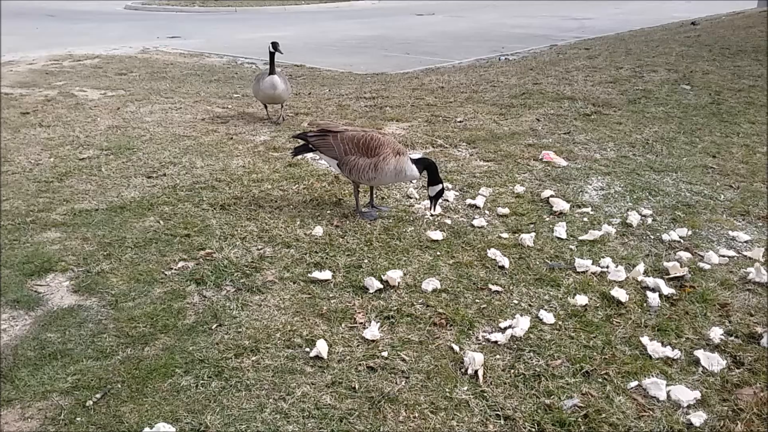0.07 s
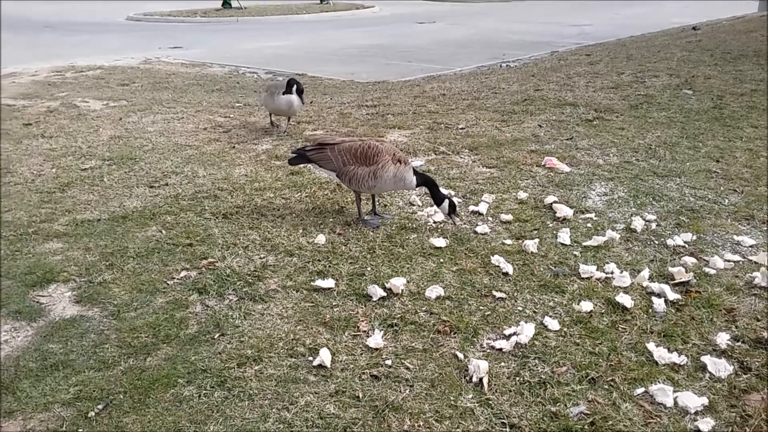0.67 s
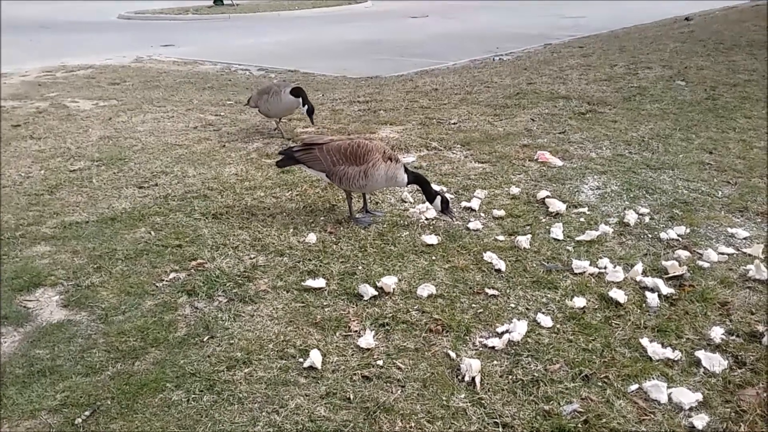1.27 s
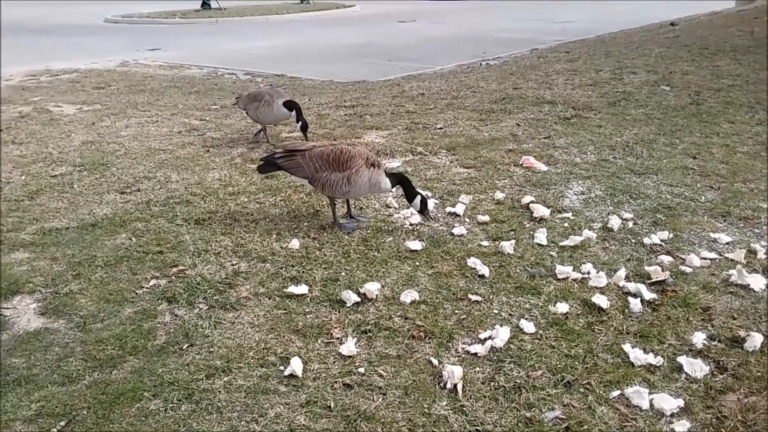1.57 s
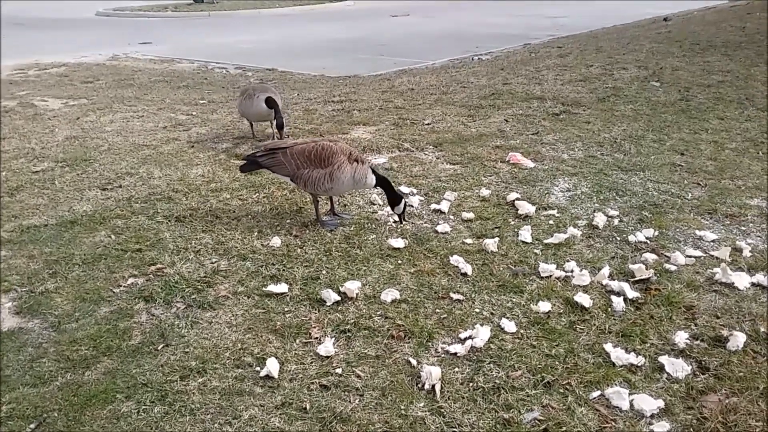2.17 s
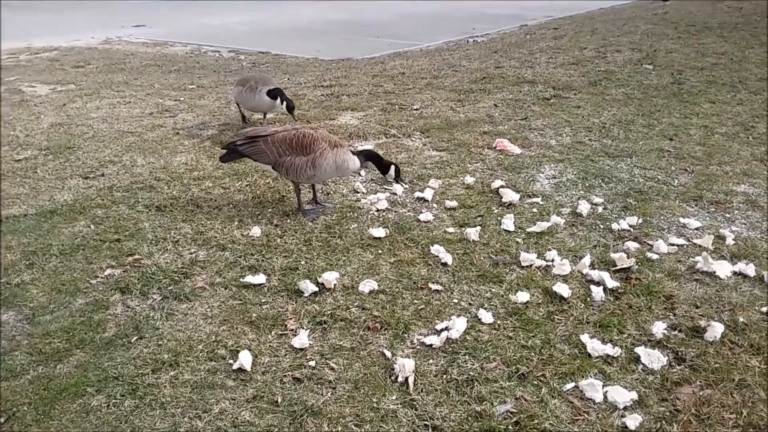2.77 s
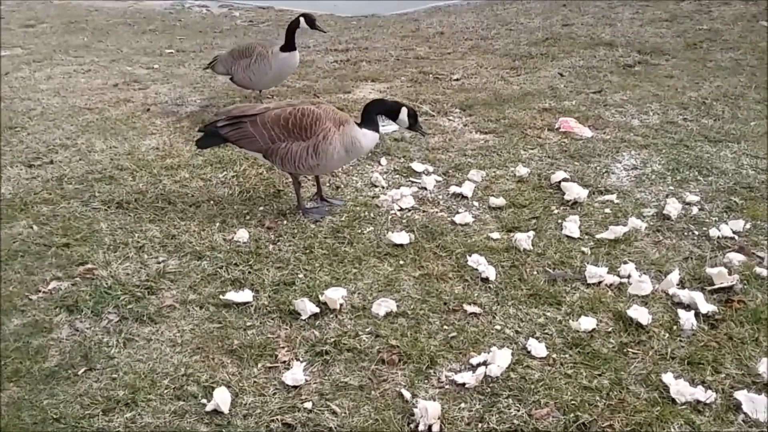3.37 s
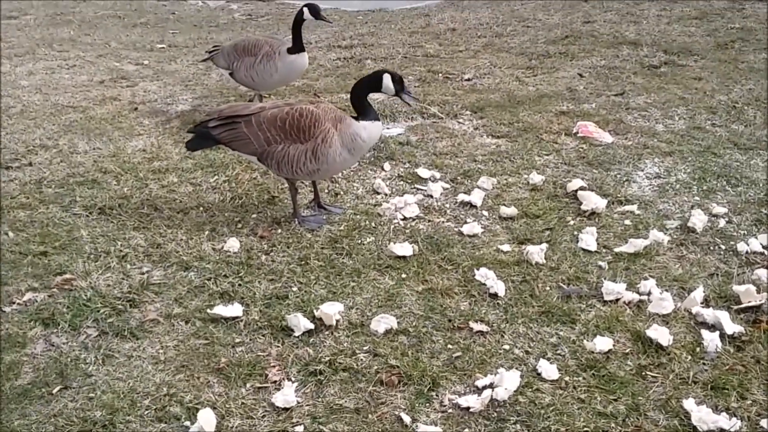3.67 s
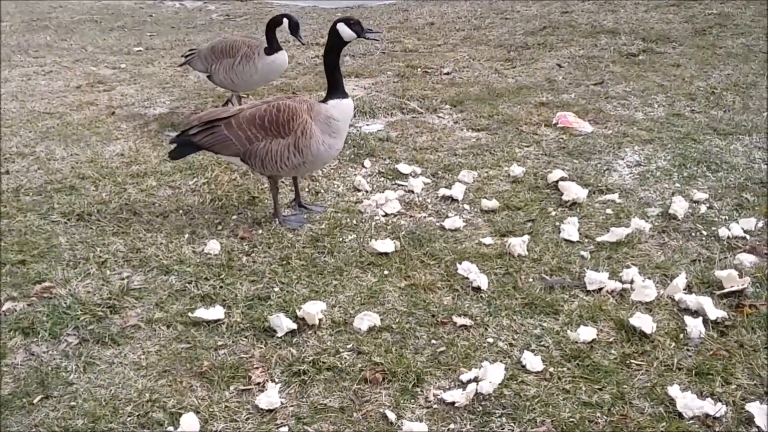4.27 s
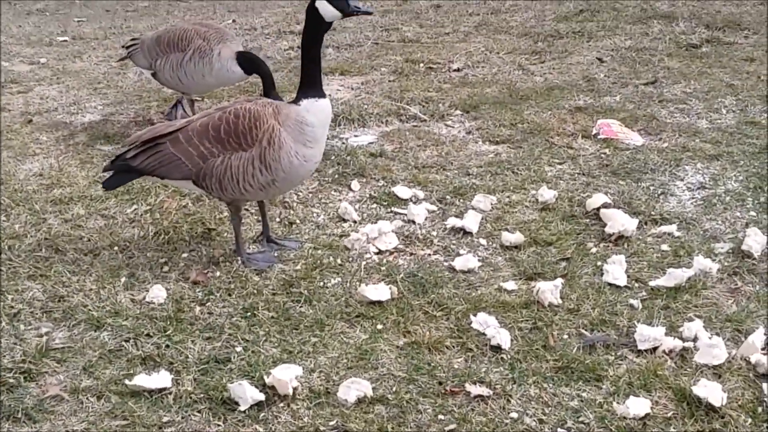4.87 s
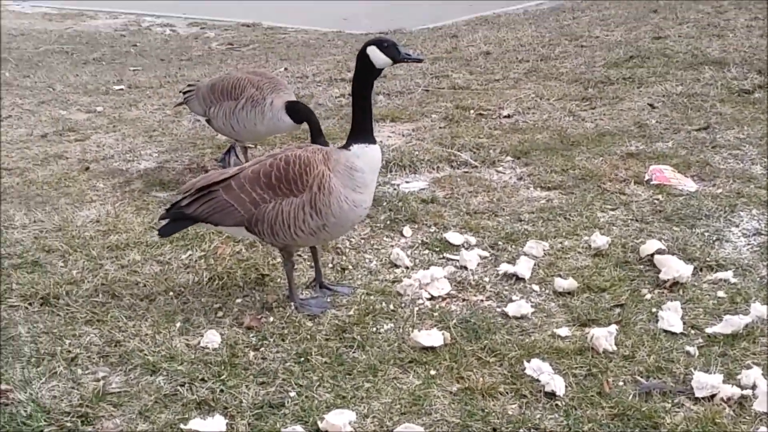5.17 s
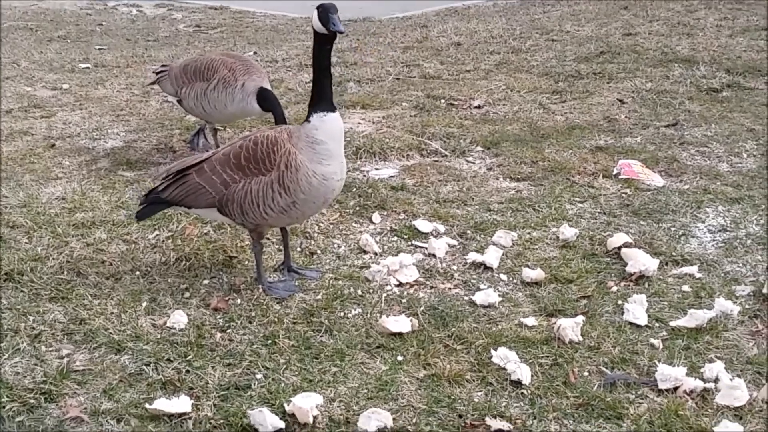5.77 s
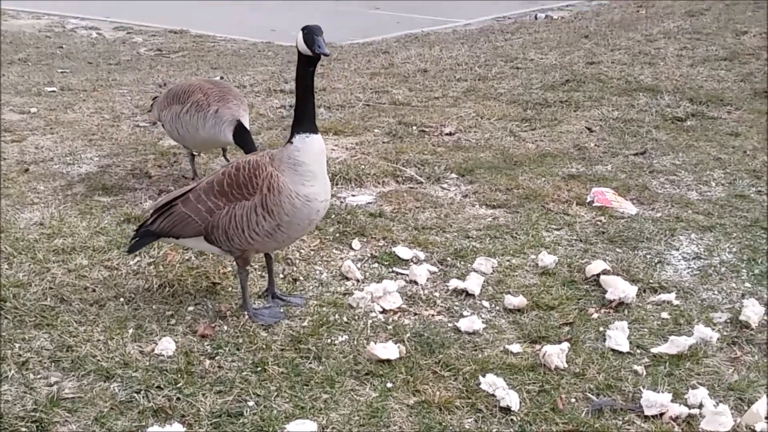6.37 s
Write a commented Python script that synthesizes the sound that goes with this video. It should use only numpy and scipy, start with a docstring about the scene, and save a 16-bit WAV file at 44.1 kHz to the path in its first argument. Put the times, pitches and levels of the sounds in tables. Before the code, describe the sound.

Far road noise with a swelling engine drone, faint two-note bird calls, dull microphone bumps and light jacket swishes.

```python
"""After a short silence, far traffic fades in: low rumble, tyre roar, faint hiss. A small bird starts
repeating a slurred two-note call; another buzzes until 1.3 s. From 1.6 s an engine revs up, its exhaust
orders shaped by the pipe; a second drones in at 2.4 s. Both surge at 4.2 s, then ease off.
Close jacket swishes, dry grass ticks and dull handling bumps, scattered till then, come thickest
after 5 s, where a thin far whistle also sounds briefly."""
import sys
import numpy as np
from scipy import signal
from scipy.fft import rfft, irfft
from scipy.io import wavfile

SR = 44100
rng = np.random.default_rng(int(sys.argv[2]) if len(sys.argv) > 2 else 0)


def wrap_up_sound(samples):
    """Save the sound to the file named by the first command line argument, as 16-bit audio."""
    columns = np.atleast_2d(samples).T
    # keep every value between -1 and 1, then stretch to whole-number steps
    tamed = np.clip(columns, -1, 1)
    steps = np.round(tamed * 32767).astype(np.int16)
    wavfile.write(sys.argv[1], SR, steps)


N = 283122
TIME = np.arange(N) / SR
FREQS = np.maximum(np.arange(N // 2 + 1) * SR / N, 1)
SURGE_S, SURGE_HALF_S = 4.2, 0.25   # both engines

# revving engine pitch: time_s, second_harmonic_hz
REV_PITCH = [(1.65, 144.3), (1.79, 157.4), (2.02, 175.1), (2.46, 187.9), (2.88, 206.5), (3.39, 213.7),
             (3.95, 212.6), (4.21, 202.5), (4.55, 151.1)]
# revving exhaust orders: multiple, gain_db
REV_HARMONICS = [(2, -0.5), (3, -4.5), (4, -8.5)]
# exhaust pipe resonance: freq_hz, gain_db
PIPE_RESPONSE = [(135, -12), (170, -0.5), (205, 0), (255, -2), (280, -8.5), (320, -15.5), (430, -25)]
# droning engine speed: time_s, cycle_hz
DRONE_RATE = [(2.5, 47.4), (3.01, 52.2), (3.68, 53.1), (5.7, 47.73)]
# droning exhaust orders: multiple, gain_db
DRONE_HARMONICS = [(1, -36), (2, -6.5), (3, -7.5), (5, -33), (7, -31)]
# traffic rumble: freq_hz, density_db
RUMBLE_SPECTRUM = [(25, -32), (35, -29), (47, -17.5), (60, -3.5), (75, -8), (95, 3), (118, -4.5), (145, -3),
                   (180, -2.5), (230, -3.5), (295, -8), (380, -18), (500, -27.5)]
# tyre roar: freq_hz, density_db
TYRE_SPECTRUM = [(240, -21), (400, -8.5), (480, -3.5), (853, -1), (1450, -1.5), (1870, -6), (2640, -18.5),
                 (3200, -30), (4160, -55), (7040, -120)]
# passing cars: middle_s, half_length_s, boost_db, treble_boost_db
CAR_PASSES = [(.95, 0.28, 0.5, 2.5), (3.65, 0.27, 2.5, -3), (4.6, 0.34, 0.5, 1)]
# handling bumps: start_s, level_db, pitch_hz, t60_s
CASING_BUMPS = [(1.813, -17, 119, 0.036), (2.937, -23, 90, .055), (3.704, -10, 160, 0.027),
                (3.711, -26, 75, 0.052), (5.244, -22, 147, 0.037), (5.453, -27, 168, 0.027)]
# bird calls: start_s, first_note_db, second_note_db, time_stretch
BIRD_CALLS = [(.521, -66, -58, 0.95), (1.417, -63, -65, 0.98), (2.752, -63, -61.5, 0.96),
              (4.193, -66.5, -66.5, 1.03), (5.364, -61, -77, 1.2), (6.158, -64, -69.5, 1.07)]
# notes of one call: delay_s, rise_s, fall_s, first_hz, top_hz, last_hz
CALL_NOTES = [(0, .012, .046, 4260, 5550, 3620), (0.068, 0.017, .028, 3475, 4390, 3310)]
# bird throat resonance: freq_hz, gain_db
THROAT_RESPONSE = [(3200, -7), (3550, 3), (3850, -3), (4400, -11.5), (5200, -6.5), (5700, -10)]
# far whistle: time_s, pitch_hz, level_db
WHISTLE_CURVE = [(5.1, 5700, -83), (5.19, 5730, -81), (5.27, 5680, -76), (5.34, 5650, -79)]
# bird buzz: freq_hz, density_db
BUZZ_SPECTRUM = [(3600, -15), (4200, -8), (4550, 2), (5000, -8), (5600, -8.5), (6200, -21), (7200, -27.5)]
# cloth strokes: middle_s, half_length_s, body_db, sheen_db
CLOTH_STROKES = [(2.095, 0.071, -71.5, -67.5), (2.252, 0.25, -80, -74.5), (3.025, 0.03, -74.5, -76),
                 (3.225, .14, -84, -78.5), (4.254, .014, -75, -76), (4.892, 0.048, -64, -62.5),
                 (5.097, 0.025, -67, -68), (5.29, 0.19, -73.5, -79), (5.58, 0.041, -69.5, -95),
                 (5.687, 0.061, -62.5, -68.5), (5.925, 0.052, -66, -71.5), (6.042, 0.097, -71, -82),
                 (6.41, 0.081, -73.5, -73)]
# cloth friction layers: freq_hz, density_db
BODY_SPECTRUM = [(2200, -1.5), (2800, -3.5), (3500, -9), (4700, -3.5), (5500, -3.5), (6300, -1.5),
                 (7000, -4), (8000, -13), (11000, -24)]
SHEEN_SPECTRUM = [(6000, -26), (7800, -6), (9200, -4), (10400, 2), (11000, -2), (11800, -14), (15500, -13)]
SCRAPE_SPECTRUM = [(1700, -1.5), (2300, 4), (2800, -3), (3300, -16)]
# grass ticks: start_s, level_db, centre_hz
GRASS_SNAPS = [(.745, -62.5, 5670), (.828, -64, 5570), (2.424, -63, 5200), (4.243, -63, 6200),
               (5.422, -60.5, 5960), (5.588, -59, 6000), (5.712, -58, 6270), (5.894, -54, 5750),
               (5.999, -44, 13400), (6.069, -55, 5540)]
# steady hiss: freq_hz, density_db
HISS_SPECTRUM = [(2500, 11), (3500, 2), (4500, -0.5), (5600, -3), (8000, -5), (10000, -1), (12500, -0.5),
                 (15000, -0.5), (16000, 0.5)]


def revving_engine(level_db=-38, surge_db=3.5, waver_db=1.9):
    """Firing rate climbs, holds, falls; each order peaks as it crosses the pipe resonance."""
    firing_hz = in_time(REV_PITCH)[0] / 2
    engine_db = level_db + surge_db * swell(SURGE_S, SURGE_HALF_S)
    exhaust = np.zeros(N)
    for multiple, gain_db in REV_HARMONICS:
        hz = multiple * firing_hz
        exhaust += exhaust_order(hz, engine_db + gain_db + at_hz(PIPE_RESPONSE, hz), waver_db)
    return exhaust * held(start_s=1.58, attack_s=0.19, end_s=4.68, release_s=0.3)


def droning_engine(level_db=-35.5, surge_db=4.0, coast_db=-4.5, waver_db=2.36):
    """A steadier exhaust note pulls, surges, then coasts away."""
    cycle_hz, = in_time(DRONE_RATE)
    coasting = ramp(start_s=4.22, length_s=0.044)
    surge = swell(SURGE_S, SURGE_HALF_S) * (1 - coasting)
    engine_db = level_db + surge_db * surge + coast_db * coasting
    exhaust = sum(exhaust_order(multiple * cycle_hz, engine_db + gain_db, waver_db)
                  for multiple, gain_db in DRONE_HARMONICS)
    return exhaust * held(start_s=2.35, attack_s=0.55, end_s=5.95, release_s=0.86)


def exhaust_order(hz, level_db, waver_db, jitter_rad=0.083):
    """One engine harmonic, wavering on its way through the air."""
    phase = 2 * np.pi * (np.cumsum(hz) / SR + rng.random()) + jitter_rad * drift(16)
    return np.sqrt(2) * from_db(level_db + waver_db * drift(8.1)) * np.sin(phase)


def traffic_rumble(level_db=-44, swell_db=3, waver_db=0.8):
    """Uneven low road noise with one broad swell."""
    rumble_db = level_db + swell_db * swell(middle_s=3.25, half_s=3) + waver_db * drift(8.2)
    return from_db(rumble_db) * coloured(RUMBLE_SPECTRUM)


def tyre_roar(level_db=-51.5, fall_db_per_s=0.26, shelf_db=-1.14, shelf_hz=1700):
    """Tyre noise slowly recedes; passing cars lift its level and shift its treble."""
    roar_db, treble_db = level_db - fall_db_per_s * TIME, np.full(N, shelf_db)
    for middle_s, half_s, boost_db, treble_boost_db in CAR_PASSES:
        passing = swell(middle_s, half_s)
        roar_db += boost_db * passing
        treble_db += treble_boost_db * passing
    tyres = coloured(TYRE_SPECTRUM)
    treble = irfft(rfft(tyres) / (1 + (shelf_hz / FREQS) ** 8), N)
    return from_db(roar_db) * (tyres + (from_db(treble_db) - 1) * treble)


def handling_bumps(rise_s=0.0057, low_cut_hz=42):
    """A hand nudges the casing: a few cycles of a heavily damped low mode."""
    out = np.zeros(N)
    for start_s, level_db, pitch_hz, t60_s in CASING_BUMPS:
        age_s = np.clip(TIME - start_s, 0, 1)
        attack = 1 - np.exp(-(age_s / rise_s) ** 2)
        decay = from_db(level_db - 60 * age_s / t60_s)
        out += 2 * attack * decay * np.sin(2 * np.pi * pitch_hz * age_s)
    return signal.sosfilt(signal.butter(2, low_cut_hz, "high", fs=SR, output="sos"), out)


def whistling_birds(flutter_db=4.0, wobble_depth=0.01444):
    """Two-note calls and one thin whistle: near-pure tones with fast flutter and outdoor echoes."""
    flutter = from_db(flutter_db * drift(150))
    wobble = 1 + wobble_depth * drift(258)
    notes = [thin_whistle()]
    for start_s, first_db, second_db, stretch in BIRD_CALLS:
        for note, level_db in zip(CALL_NOTES, (first_db, second_db)):
            notes.append(arched_note(start_s, level_db, stretch, note))
    song = sum(gain * np.sin(2 * np.pi * np.cumsum(hz * wobble) / SR) for hz, gain in notes)
    return echoes(song * flutter, level_db=-5.5, t60_s=0.34)


def arched_note(call_s, level_db, stretch, note, edge_s=0.0023, bend=1.5):
    """Pitch and gain of an up-down slur; loudness follows the throat resonance."""
    delay_s, rise_s, fall_s, first_hz, top_hz, last_hz = note
    start_s, top_s, end_s = call_s + stretch * np.cumsum([delay_s, rise_s, fall_s])
    upslur_hz = (first_hz - top_hz) * (1 - ramp(start_s, top_s - start_s)) ** bend
    downslur_hz = (last_hz - top_hz) * ramp(top_s, end_s - top_s) ** bend
    hz = top_hz + upslur_hz + downslur_hz
    return hz, held(start_s, edge_s, end_s, edge_s) * from_db(level_db + at_hz(THROAT_RESPONSE, hz))


def thin_whistle(edge_s=0.02):
    """Pitch and gain of one far, held note."""
    hz, level_db = in_time(WHISTLE_CURVE)
    start_s, end_s = WHISTLE_CURVE[0][0], WHISTLE_CURVE[-1][0]
    return hz, from_db(level_db) * held(start_s, edge_s, end_s, edge_s)


def buzzing_bird(level_db=-72.5, rough_db=2.0, end_s=1.27, release_s=0.25):
    """A far bird's buzz: a rough, narrow noise band that ends early."""
    fade = 1 - ramp(end_s - release_s, release_s)
    return fade * from_db(level_db + rough_db * drift(50)) * coloured(BUZZ_SPECTRUM)


def cloth_swishes(grain_db=2.0, sheen_grain_db=0.5, flutter_db=2.5, scrape_db=-1.0, dull_span_db=1.0):
    """Fibres slide and catch: grainy friction noise under uneven pressure; dull strokes also scrape."""
    body_power, sheen_power, scrape_power = np.zeros((3, N))
    for middle_s, half_s, body_db, sheen_db in CLOTH_STROKES:
        stroke = swell(middle_s, half_s)
        dullness = np.clip((body_db - sheen_db) / dull_span_db, 0, 1)
        body_power += stroke * from_db(body_db) ** 2
        sheen_power += stroke * from_db(sheen_db) ** 2
        scrape_power += stroke * dullness * from_db(body_db + scrape_db) ** 2
    catches = drift(180)
    pressure = from_db(flutter_db * drift(23))
    out = np.zeros(N)
    for power, spectrum, depth_db in [(body_power, BODY_SPECTRUM, grain_db),
                                      (sheen_power, SHEEN_SPECTRUM, sheen_grain_db),
                                      (scrape_power, SCRAPE_SPECTRUM, grain_db)]:
        friction = rng.standard_normal(N) * from_db(depth_db * catches)
        out += np.sqrt(power) * coloured(spectrum, friction)
    return pressure * out


def grass_ticks(band_ratio=1.21, rise_s=0.002, t30_cycles=100):
    """Dry blades snap in short crackles; the higher, the shorter."""
    out, age_s = np.zeros(N), TIME[:SR // 8]
    for start_s, level_db, centre_hz in GRASS_SNAPS:
        edges_hz = [centre_hz / band_ratio, min(centre_hz * band_ratio, 0.45 * SR)]
        band = signal.butter(3, edges_hz, "band", fs=SR, output="sos")
        crackle = rms_one(signal.sosfilt(band, rng.standard_normal(len(age_s))))
        fall_db = 30 * age_s * centre_hz / t30_cycles
        envelope = from_db(level_db - fall_db) * np.minimum(age_s / rise_s, 1)
        out[round(start_s * SR):][:len(age_s)] += crackle * envelope
    return out


def echoes(sound, level_db, t60_s, gap_s=0.008):
    """Direct sound plus scattered returns from ground, trees and walls."""
    age_s = TIME[:SR // 2]
    tail = rng.standard_normal(len(age_s)) * from_db(-60 * age_s / t60_s) * (age_s > gap_s)
    return sound + from_db(level_db) * signal.fftconvolve(sound, tail / np.linalg.norm(tail))[:N]


def hiss(level_db=-73.0):
    """Faint, steady treble noise."""
    return from_db(level_db) * coloured(HISS_SPECTRUM)


def coloured(spectrum, source=None):
    """White noise or a given source, shaped by a spectrum with steep skirts; unit power."""
    source = rng.standard_normal(N) if source is None else source
    skirts = np.minimum(1, FREQS / spectrum[0][0]) ** 4 * np.minimum(1, spectrum[-1][0] / FREQS) ** 4
    return rms_one(irfft(rfft(source) * skirts * from_db(at_hz(spectrum, FREQS)), N))


def drift(rate_hz):
    """Random wander below a rate; unit power."""
    return rms_one(irfft(rfft(rng.standard_normal(N)) / (1 + (FREQS / rate_hz) ** 2), N))


def ramp(start_s, length_s):
    """Linear rise from 0 to 1."""
    return np.clip((TIME - start_s) / length_s, 0, 1)


def held(start_s, attack_s, end_s, release_s):
    """Attack, hold, release."""
    return ramp(start_s, attack_s) * (1 - ramp(end_s - release_s, release_s))


def swell(middle_s, half_s):
    """Bell curve of height 1."""
    return np.exp(-np.minimum(((TIME - middle_s) / half_s) ** 2, 60))


def in_time(curve):
    """A curve's value columns at every sample."""
    time_s, *columns = np.transpose(curve)
    return [np.interp(TIME, time_s, column) for column in columns]


def at_hz(spectrum, hz):
    """A spectrum's dB at given frequencies."""
    freq_hz, db = np.transpose(spectrum)
    return np.interp(np.log(hz), np.log(freq_hz), db)


def from_db(db):
    """Decibels to gain."""
    return 10 ** (np.asarray(db) / 20)


def rms_one(x):
    """Scale to unit power."""
    return x / np.sqrt(np.mean(x ** 2) + 1e-20)


def scene():
    """Road, birds and small near sounds over hiss; mono."""
    road = traffic_rumble() + tyre_roar() + revving_engine() + droning_engine()
    birds = whistling_birds() + buzzing_bird()
    near = cloth_swishes() + grass_ticks() + handling_bumps()
    return (road + birds + near + hiss())[None]


def record(dry):
    """Silent start, fade-in, steep treble cut."""
    fade_in, cutoff_hz = ramp(start_s=0.44, length_s=0.31), 15800
    lowpass = signal.ellip(10, 0.2, 70, cutoff_hz, fs=SR, output="sos")
    return signal.sosfilt(lowpass, dry * fade_in)


dry = scene()
out = record(dry)
wrap_up_sound(out)
```